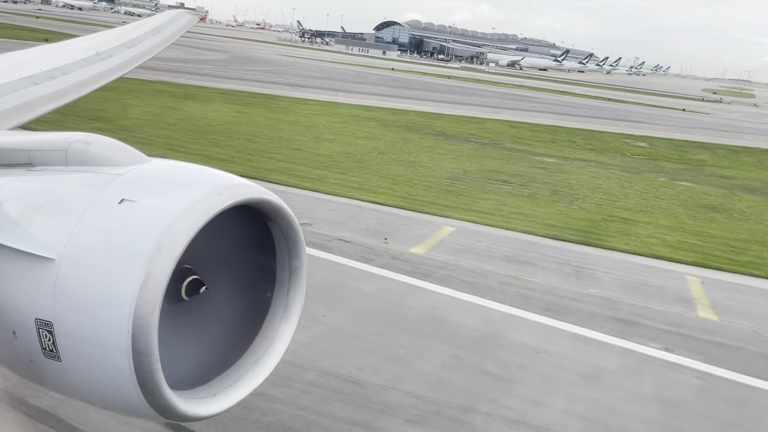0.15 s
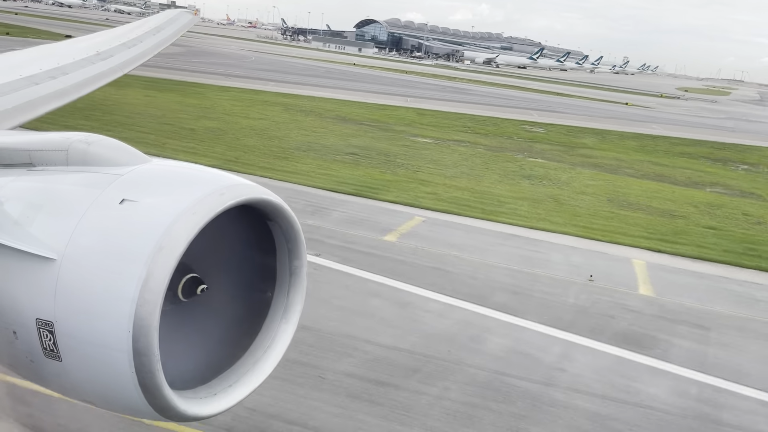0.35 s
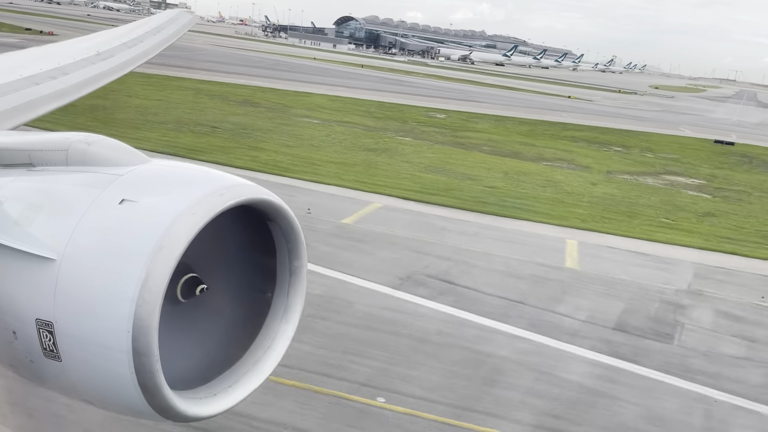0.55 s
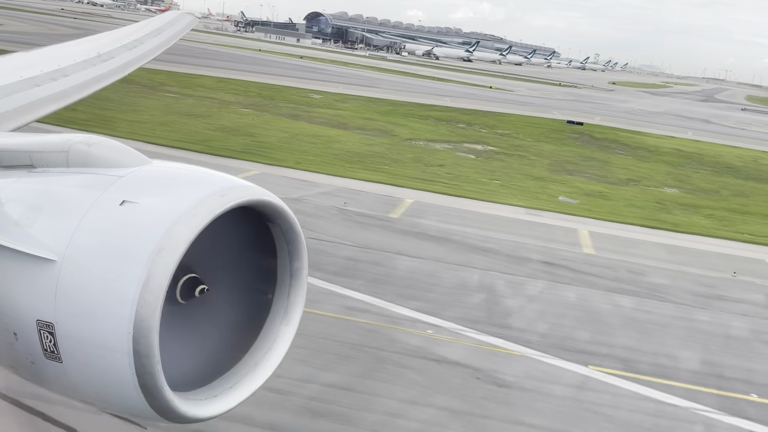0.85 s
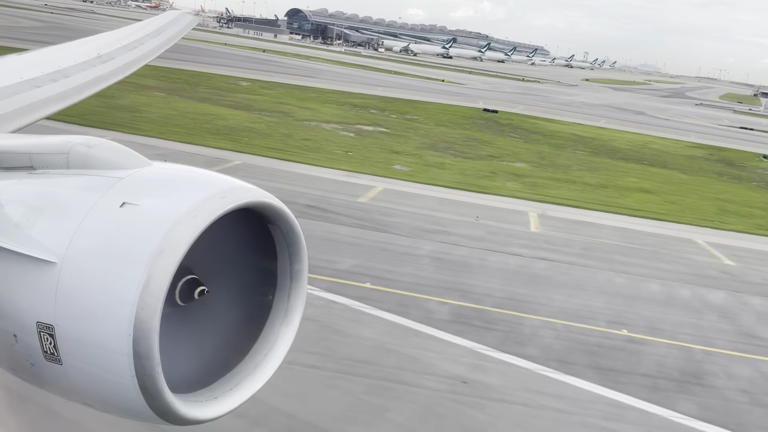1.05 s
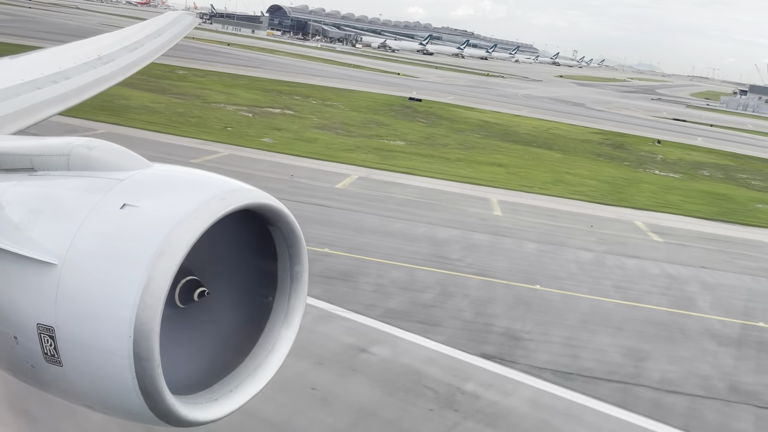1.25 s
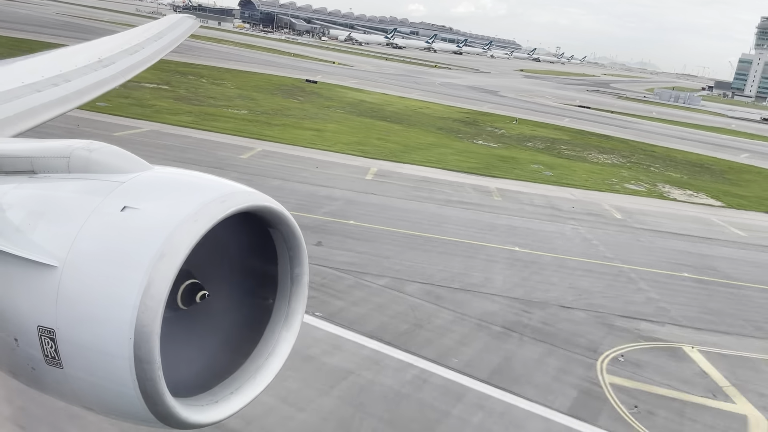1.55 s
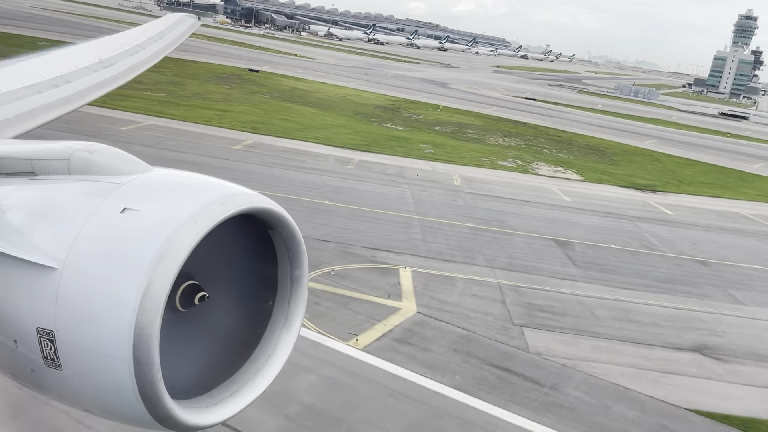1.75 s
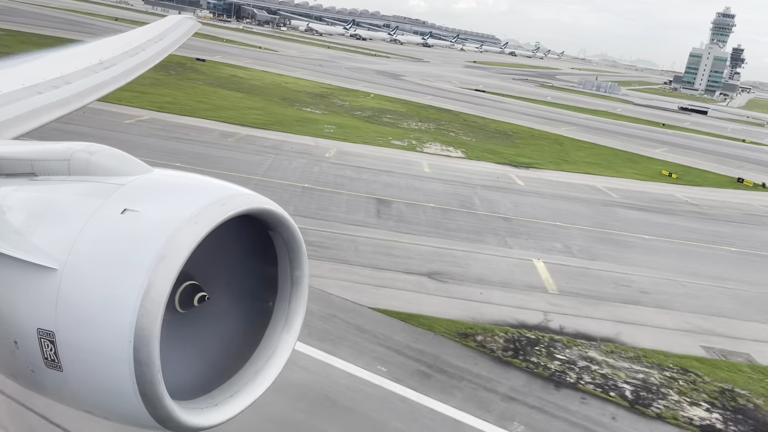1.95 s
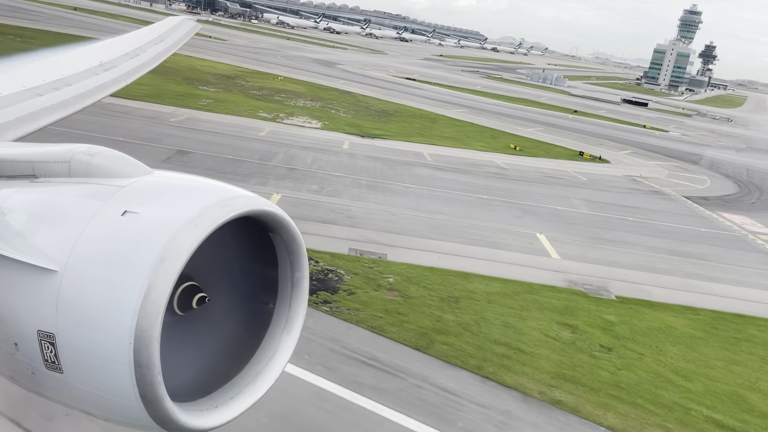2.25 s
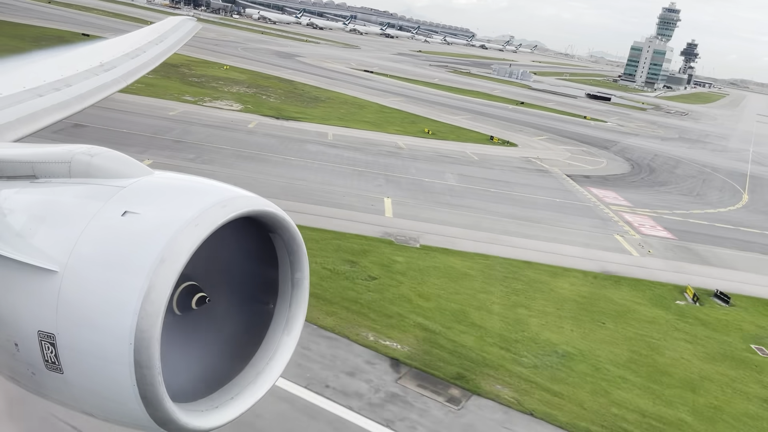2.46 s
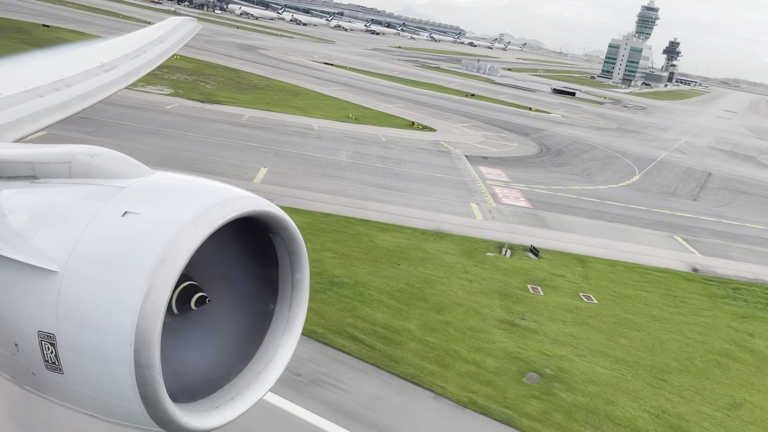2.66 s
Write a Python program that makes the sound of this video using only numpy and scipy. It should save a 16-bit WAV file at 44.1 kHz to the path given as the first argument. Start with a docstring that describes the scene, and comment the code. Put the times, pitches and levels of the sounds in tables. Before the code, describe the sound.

Inside an airliner cabin on the takeoff roll, deep engine rumble and a constant buzzing fan tone fill the space; slight hiss fades early, tiny ticks come later, captured close in stereo with thick, compressed bass.

```python
"""Take-off roll in an airliner cabin

Heard through the cabin wall beside the wing: the fan tips run supersonic and sing a buzz-saw, a tone
on every multiple of the shaft speed. Under it lies the jet's broad roar, noise deepest near 70 Hz,
with a treble hiss that settles; a few small trim ticks are short bright bursts of noise.
Two close microphones pick it up, and a limiter rounds off the bass."""
import sys
import numpy as np
from scipy import signal
from scipy.fft import rfft, irfft, next_fast_len
from scipy.io import wavfile

SR = 44100
rng = np.random.default_rng(int(sys.argv[2]) if len(sys.argv) > 2 else 0)


def bounce(signal):
    """Save signal as a 16-bit WAV file at the path given by the first command-line argument."""
    frames = np.transpose(np.atleast_2d(signal))
    limited = np.clip(frames, -1, 1)
    pcm = np.round(limited * 32767).astype(np.int16)
    wavfile.write(sys.argv[1], SR, pcm)


N = 123479  # length in samples


def from_db(db):
    """Turn a level in dB into a gain."""
    return 10 ** (np.asarray(db) / 20)


def in_time(rows):
    """Draw straight lines between (seconds, value) rows, one value per sample."""
    seconds, value = np.transpose(rows)
    return np.interp(np.arange(N) / SR, seconds, value)


def at_hz(table, hz):
    """Read the columns of a spectrum table at the given frequencies, straight over log frequency."""
    table_hz, *columns = np.transpose(table)
    return [np.interp(np.log(hz), np.log(table_hz), column) for column in columns]


def drift(rate_hz):
    """Slow random wander of RMS 1: noise through two equal low-pass poles at rate_hz."""
    step, warm_up = 100, 1500  # samples per slow value; slow values dropped while the filter settles
    pole = np.exp(-2 * np.pi * rate_hz * step / SR)
    noise = rng.standard_normal(N // step + warm_up + 2)
    slow = signal.lfilter([1], [1, -2 * pole, pole * pole], noise)[warm_up:]
    slow = slow / np.sqrt(np.mean(slow ** 2))
    return np.interp(np.arange(N) / step, np.arange(len(slow)), slow)


def buzz_saw():
    """Supersonic fan tips: sines on the shaft's multiples, wavering more the higher they lie."""
    # Shaft speed, as its 14th multiple. Each row: time in seconds, frequency in Hz.
    shaft_x14 = [(0, 702.8), (1.3, 702.6), (1.9, 703.4), (2.8, 703.0)]
    # Lower buzz tones in the cabin. Each row: multiple of shaft speed, left RMS level in dB,
    # right RMS level in dB, left's phase lead in radians, trend in dB per second.
    low_tones = [(2, -23.0, -25.0, -0.3, -0.0), (3, -18.0, -18.0, -0.0, 0.0), (4, -17.0, -17.0, 0.0, -0.0),
                 (5, -31.0, -30.0, -0.0, 0.9), (6, -26.0, -28.0, -0.0, -0.7), (7, -32.0, -34.0, -0.2, -0.4),
                 (8, -39.0, -45.0, -1.0, -2.3), (9, -36.0, -36.0, -0.2, -1.7),
                 (10, -55.0, -47.0, 2.7, -1.7), (11, -43.0, -40.0, -0.8, 0.2),
                 (12, -38.0, -33.0, -1.8, 0.6), (13, -55.0, -53.0, 2.2, 1.1), (14, -46.0, -25.0, 1.7, 0.5),
                 (15, -44.0, -32.0, 0.8, -2.0), (16, -41.0, -35.0, 1.2, -3.0),
                 (17, -58.0, -47.0, -1.1, -1.0), (18, -54.0, -48.0, 1.2, 1.2),
                 (19, -58.0, -54.0, -0.3, 1.3), (20, -47.0, -45.0, 0.4, 2.9), (21, -49.0, -42.0, 0.5, 0.5),
                 (22, -53.0, -51.0, 0.5, -2.0), (23, -57.0, -54.0, 0.0, 1.4), (24, -58.0, -52.0, 0.8, 1.6),
                 (25, -50.0, -48.0, -2.9, -3.4), (26, -45.0, -40.0, 2.7, 1.1),
                 (27, -58.0, -49.0, 1.6, -1.3), (28, -57.0, -48.0, 0.7, -1.0),
                 (29, -48.0, -51.0, 2.2, -0.5), (30, -65.0, -55.0, 1.5, 0.2), (31, -63.0, -50.0, 0.2, -0.6),
                 (32, -60.0, -50.0, 2.2, -1.8), (33, -64.0, -61.0, 0.1, -1.7), (34, -47.0, -46.0, 1.2, 6.4),
                 (35, -51.0, -48.0, 1.2, -0.7), (36, -63.0, -55.0, 0.8, -4.0),
                 (37, -58.0, -54.0, 1.0, -4.1), (38, -63.0, -61.0, 1.0, 2.2), (39, -65.0, -60.0, 0.1, -3.0),
                 (40, -61.0, -57.0, 0.2, 0.8), (41, -64.0, -56.0, 0.4, 1.9), (42, -63.0, -58.0, 0.3, -0.9),
                 (43, -55.0, -51.0, -1.4, 0.8), (44, -58.0, -63.0, -0.4, -0.7)]
    # Multiples locked in phase, odd ones a quarter cycle off: a flutter twice a turn.
    # The pair: first multiple, last multiple.
    in_step = (11, 17)
    trend_most_db = 3  # cap on the trend's rise above its mid-scene value
    waver_least, waver_most, waver_full_order, waver_hz = .17, .6, 34, 2.5  # least and most: shares 0-1

    # The higher multiples follow a falling slope with random scatter.
    high = np.arange(45, 96)
    slope_start_db, db_per_order, scatter_db = -64.5, -0.509, 7.5
    left_minus_right_db, left_lead = -4.5, -0.9  # lead in radians
    high_db = slope_start_db + db_per_order * (high - high[0])
    high_db = high_db + scatter_db * rng.standard_normal(len(high))
    high_tones = [(k, db + left_minus_right_db, db, left_lead, 0) for k, db in zip(high, high_db)]

    shaft_angle = 2 * np.pi * np.cumsum(in_time(shaft_x14) / 14) / SR
    from_middle = (np.arange(N) - N / 2) / SR  # seconds
    out = np.zeros((2, N))
    for order, left_db, right_db, lead, db_per_s in list(low_tones) + high_tones:
        k = round(order)
        start = rng.uniform(0, 2 * np.pi)
        if in_step[0] <= k <= in_step[1]:
            start = np.pi / 2 * (k % 2)
        # The unsteady share grows with the square of the multiple.
        share = max(waver_least, waver_most * min(k / waver_full_order, 1) ** 2)
        wander = (drift(waver_hz) + 1j * drift(waver_hz)) / np.sqrt(2)
        waver = np.sqrt(1 - share ** 2) + share * wander  # complex: moves strength and phase
        trend = from_db(np.minimum(db_per_s * from_middle, trend_most_db))
        trend = trend * np.sqrt(2 / np.mean(trend ** 2))  # a steady sine would have RMS 1
        tone = trend * waver * np.exp(1j * (k * shaft_angle + start))
        left = from_db(left_db) * (tone * np.exp(1j * lead)).real
        right = from_db(right_db) * tone.real
        out += [left, right]
    return out


def roar():
    """Jet noise through the wall: shaped per ear, partly shared, flickering in octave bands."""
    # Spectrum of the roar. Each row: frequency in Hz, right level in dB per Hz.
    spectrum = [(14, -54.5), (28, -54), (40, -41), (55, -36.5), (72, -27), (95, -31.5), (125, -37),
                (175, -34), (225, -42.5), (280, -42.5), (330, -45), (400, -57), (480, -61.5), (580, -63.5),
                (700, -60), (830, -62), (1000, -69), (1230, -66), (1500, -69.5), (1800, -73.5),
                (2200, -76.5), (2800, -80.5), (3600, -84.5), (4600, -89.5), (5200, -87.5), (5700, -82),
                (6200, -89.5), (6800, -95), (7600, -96.5), (8600, -99.0), (9600, -99.0), (10300, -99.0),
                (11100, -102.0), (11800, -106.0)]
    # Stereo image of the roar. Each row: frequency in Hz, likeness of the ears from 0 to 1,
    # left's phase lead in radians, left minus right in dB.
    image = [(14, 0.99, -0.0, 0.4), (95, 0.99, -0.0, 0.4), (225, 0.97, -0.1, -1.0), (280, 0.96, -0.1, 0.0),
             (330, 0.97, -0.2, 1.0), (400, 0.75, -0.1, 4.0), (480, 0.48, -0.8, 1.0),
             (580, 0.32, -1.3, -3.0), (700, 0.38, 0.8, -6.0), (830, 0.62, 1.3, -10.0),
             (1000, 0.78, 0.6, -3.0), (1230, 0.35, 2.5, -4.0), (1500, 0.56, 1.5, -3.0),
             (1800, 0.66, 0.8, -4.0), (2200, 0.39, -0.7, -5.0), (2800, 0.42, -0.8, -6.0),
             (3600, 0.51, -0.6, -3.0), (4600, 0.33, -0.9, -3.0), (5200, 0.24, -1.2, -6.0),
             (5700, 0.42, -0.7, -9.0), (6200, 0.53, -0.7, -5.0), (6800, 0.47, -0.6, -3.0),
             (7600, 0.63, -1.3, -3.0), (8600, 0.99, -0.0, 0.0), (9600, 0.62, 2.2, 0.0),
             (10300, 0.99, 3.1, -1.0), (11100, 0.46, 4.2, 0.0), (11800, 0.99, 6.3, 0.0)]
    # Settling of the hiss band. Each row: time in seconds, level in dB against the plain roar there.
    hiss_level = [(0, 8), (.3, 6), (.5, 2.5), (.9, 0), (2.8, -.5)]
    hiss_hz, hiss_width_hz = 8400, 790
    flicker_db, flicker_hz, flicker_centre_hz = 0.53, 12, 7050  # the centre sits one octave below the top band's

    size = next_fast_len(N)
    hz = np.maximum(np.fft.rfftfreq(size, 1 / SR), 1)
    (right_db,) = at_hz(spectrum, hz)
    alike, lead, pan_db = at_hz(image, hz)
    shared, own = rfft(rng.standard_normal((2, size)), axis=1) * np.sqrt(SR / 2)
    left_noise = alike * shared * np.exp(1j * lead) + np.sqrt(1 - alike ** 2) * own
    both = np.array([from_db(right_db + pan_db) * left_noise, from_db(right_db) * shared])

    out = 0
    octave = np.clip(np.log2(hz / flicker_centre_hz), -9, 1)
    for band in range(-9, 2):
        weight = np.clip(1 - abs(octave - band), 0, 1)  # neighbouring bands crossfade
        band_noise = irfft(both * weight, size)[:, :N]
        out = out + band_noise * from_db(flicker_db * drift(flicker_hz))

    hiss_shape = np.exp(-((hz - hiss_hz) / hiss_width_hz) ** 2)
    hiss = irfft(both * hiss_shape, size)[:, :N]
    return out + hiss * (from_db(in_time(hiss_level)) - 1)  # minus 1: the roar already holds it once


def ticks():
    """Small ticks of cabin trim: bright snaps of noise that die in milliseconds, alike in both ears."""
    # Each row: start in seconds, level in dB before the boost and the high-pass.
    snaps = [(1.2171, -44), (2.1211, -51), (2.2872, -55), (2.3206, -55)]
    t60_s, low_hz, boost_db = .015, 4800, 3  # time to fall 60 dB, high-pass corner, added level
    t = np.arange(1024) / SR
    out = np.zeros(N + len(t))
    for (start_s, db), noise in zip(snaps, rng.standard_normal((len(snaps), len(t)))):
        first = int(start_s * SR)
        out[first:first + len(t)] += from_db(db + boost_db - 60 * t / t60_s) * noise
    return signal.sosfilt(signal.butter(4, low_hz, "high", fs=SR, output="sos"), out[:N])


def scene():
    """Mix the fan's buzz, the jet's roar and the trim's ticks in stereo."""
    return buzz_saw() + roar() + ticks()


def record(dry):
    """Round off the swells of the bass with a quick limiter, then cut the top."""
    bass_hz, makeup_db, cutoff_hz = 396, 0.16, 12600  # the makeup lifts the bass alone
    ceiling, knee = .82, 3  # top of the bass swells at full scale 1, hardness of the knee
    makeup = from_db(makeup_db)
    bass = signal.sosfiltfilt(signal.butter(3, bass_hz, fs=SR, output="sos"), dry)
    envelope = abs(signal.hilbert(bass.mean(0), next_fast_len(N))[:N])  # one for both ears
    swell = makeup * envelope / ceiling + 1e-9
    gain = makeup * np.tanh(swell ** knee) ** (1 / knee) / swell
    # Only the low part of the gain change is kept, so the limiter adds no treble.
    smooth = signal.butter(4, 1.5 * bass_hz, fs=SR, output="sos")
    change = signal.sosfiltfilt(smooth, bass * (gain - 1), padtype="constant", padlen=2000)
    held = dry + change
    top_cut = signal.cheby2(20, 70, cutoff_hz, fs=SR, output="sos")
    first = held[:, :1]  # filtering around the first sample avoids a jump at the start
    return signal.sosfilt(top_cut, held - first) + first


dry = scene()
out = record(dry)
bounce(out)
```